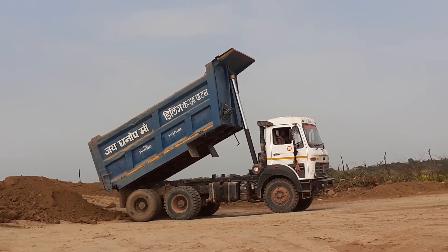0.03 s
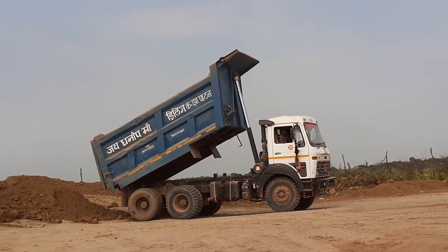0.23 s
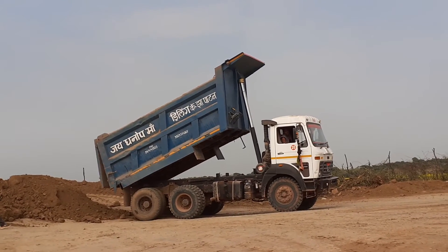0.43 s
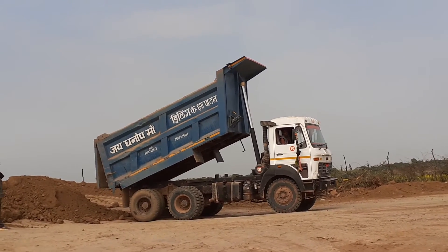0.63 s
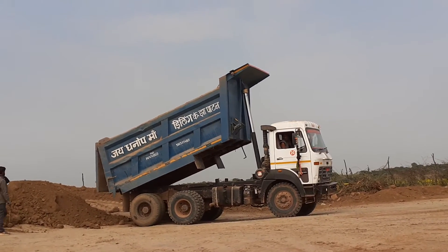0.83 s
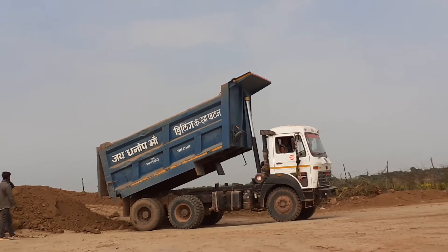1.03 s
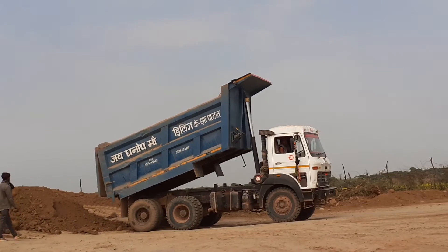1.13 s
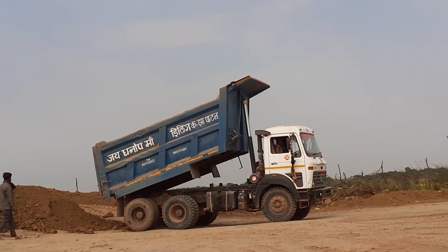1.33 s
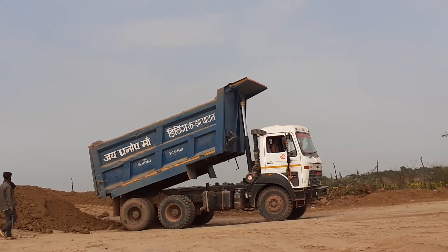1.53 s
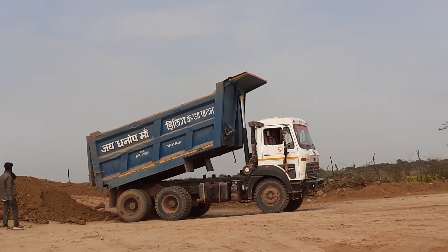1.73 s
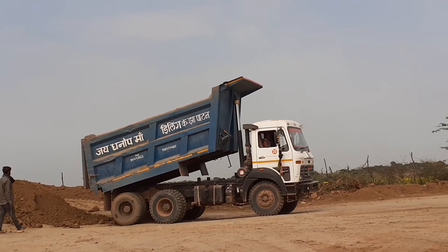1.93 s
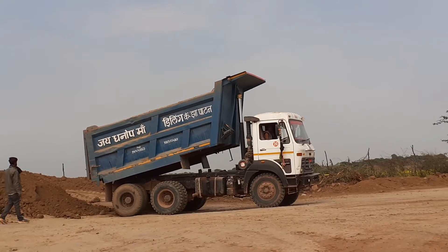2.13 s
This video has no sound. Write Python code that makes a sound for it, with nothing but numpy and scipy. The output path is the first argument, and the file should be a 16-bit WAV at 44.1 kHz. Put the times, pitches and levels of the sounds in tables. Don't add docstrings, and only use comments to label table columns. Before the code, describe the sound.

A dump truck's steel tailgate slams with a deep hollow boom, rings and rattles; after soft knocks and a latch clank it slams again, over steady diesel rumble, on open ground, heard through a phone.

```python
import sys
import numpy as np
from scipy import signal
from scipy.fft import rfft, irfft, next_fast_len
from scipy.io import wavfile
from scipy.ndimage import map_coordinates

SR = 44100
rng = np.random.default_rng(int(sys.argv[2]) if len(sys.argv) > 2 else 0)


def boost_factor(decibels):
    exponent = np.asarray(decibels, float) / 20
    return 10 ** exponent


def inscribe(sig):
    pcm = np.round(np.clip(np.atleast_2d(sig).T, -1, 1) * 32767)
    wavfile.write(sys.argv[1], SR, pcm.astype(np.int16))


N = 97020

# start in seconds, ring in dB, boom in dB, crack in dB.
FIRST_SLAM = [
    (.240, -44, -15.5, -15.5),
    (.249, -15.5, -17, -29),
    (.268, -23, -24, -28),
    (.324, -24.5, -27.5, -49),
]
SECOND_SLAM = [
    (1.551, -35, -17.5, -18.5),
    (1.560, -13.5, -19.5, -36),
    (1.584, -28.5, -21.5, -30.5),
    (1.648, -33, -30.5, -36.5),
]
LATCH_CLANK = [
    (1.379, -16.5, -30, -37),
    (1.3897, -24, -33, -35.5),
    (1.411, -27.5, -38, -44),
    (1.4205, -26.5, -39, -47),
    (1.433, -30.5, -43, -50),
]
# frequency in Hz, level in dB, t60 in seconds.
BED_LOW_MODES = [(98.2, -4, 1), (265.5, -9, 0.93), (368.7, -14, 0.88), (500, -10, 0.78), (612, -11, 0.52),
                 (635, -8, 0.65), (667, -13, 0.49), (733, -10, .4), (759, -7, 0.55), (797, -6.5, 0.29),
                 (1012, -22, 0.25), (1123, -12.5, 0.25)]
BED_HIGH_MODES = [(151.3, 2.5, 0.46), (259.5, -8, 0.79), (373, -9.5, 1), (495, -11, 0.46), (625, -6, 0.34),
                  (714, -9.5, 0.62), (771, -2.5, 0.41), (811, -7.5, 0.46), (883, -14, 0.31),
                  (993, -18, 0.12), (1134, -15.5, 0.34), (1350, -22, 0.29)]
LATCH_MODES = [(626, -11, 0.14), (739, 1, 0.12), (763, -11, 0.42), (800, -10, 0.23), (1235, -14, 0.061),
               (1480, -20, .1), (1755, -19.5, 0.083), (2130, -12, 0.098), (2380, -23, 0.056)]
BED_CYCLES, LATCH_CYCLES, GATE_CYCLES = 1.9, 3, 0.3
BEAT_DB, BEAT_RATE = 2, 14
DRIFT_RAD, DRIFT_RATE, DRIFT_AFTER_S = .45, 20, .04
REBOUND_FROM_HZ = 340
# frequency in Hz, level in dB.
PLATE_COLOUR = [(30, -2), (140, -5.5), (300, -0.5), (450, -15.5), (720, -1), (1100, -20), (4000, -32.5),
                (15500, -61)]
# frequency in Hz, t60 in seconds.
PLATE_T60 = [(60, 1), (250, 1), (800, 0.48), (3000, 0.6), (9000, 0.24)]
# frequency in Hz, level in dB.
CRACK_COLOUR = [(300, -32), (900, 12.5), (2000, -4.5), (8000, -13), (10000, -23.5), (14000, -16),
                (16000, -22)]
REBOUND_DULLING = [(3000, 7), (7500, 6), (9000, -20), (16000, -13)]
BOOM_RISE_S, CRACK_T60_S = 0.0022, .028

SLAP_S = [
    .248,
    1.56,
]
SLAP_DB = -10
# frequency in Hz, level in dB, t60 in seconds.
FIRST_GATE_MODES = [(138.5, 1, 0.16), (240, 2, 0.075), (604, -14, 0.26), (874, -10, 0.3)]
SECOND_GATE_MODES = [(126.7, 0, 0.17), (213, 4, 0.11), (244, -2.5, 0.15), (721, -3.5, 0.15),
                     (406, -12, 0.34)]
EDGE_MODES = [(617.4, -17.5, 0.11), (873, -23, 0.052), (1162, -30, .08), (1740, -29.5, 0.038)]
HOLLOW_MODES = [(203.7, -17.5, 0.23), (235.5, -2.5, 0.13), (459, -23, 0.16)]
FLOOR_MODES = [(180.7, 0, 0.61), (298.8, -2.5, 0.81)]
FLOOR_DB = [
    -10,
    -15,
]
CLIMB, CLIMB_S = .3, 0.0219
EDGE_S = [
    .241,
    .324,
    1.551,
]
EDGE_DB = [
    4,
    0,
    1.5,
]
# start in seconds, level in dB.
HOLLOW_HITS = [(1.386, -12.5), (1.9, -37.5), (1.2, -33), (1.6, -25), (0.3, -13), (.915, -30), (.935, -31.5),
               (.952, -28), (1.640, -22), (1.667, -25), (1.696, -17)]
FLOOR_NUDGES = [
    (.09, -31.5),
    (0.166, -25),
    (.905, -39.5),
    (1.72, -33),
    (1.829, -30),
]

# start in seconds, level in dB.
SOFT_KNOCKS = [
    (0.082, -24),
    (.165, -25),
    (0.198, -32),
    (0.221, -26),
    (.908, -28.5),
    (.925, -27),
    (0.954, -27),
]
# frequency in Hz, level in dB.
KNOCK_COLOUR = [(40, 2.5), (150, 9.5), (260, 5), (400, -1), (800, -42), (3000, -100)]
KNOCK_RISE_S, KNOCK_T60_S = 0.0013, 0.14
THUMPS_S = [
    .268,
    1.578,
    1.39,
]
THUMP_DB = [
    -42,
    -25,
    -39,
]
THUMP_HZ, THUMP_S = 55, .012
# start in seconds, frequency in Hz.
PINS = [
    (1.385, 11400),
    (1.408, 11400),
    (1.386, 7100),
    (1.398, 6950),
    (1.405, 4020),
]
PIN_DB = [-44.5, -53, -50, -45, -44]
PIN_T60_S = [.07, .06, 0.047, .06, 0.087]

# start in seconds, level in dB, t60 in seconds.
RATTLES = [
    (.243, -33, 0.43),
    (1.379, -37.5, 0.14),
    (1.552, -34, 0.34),
    (1.62, -40, 0.22),
]
RATTLE_RATE, RATTLE_SPREAD_DB = 900, 4
# frequency in Hz, level in dB.
GRIT_COLOUR = [(500, -4.5), (1300, 11.5), (2500, -5), (4000, -26), (7500, -3), (9000, -59), (16000, -41)]
# start in seconds, frequency in Hz, level in dB.
TICKS = [
    (.267, 3730, -30),
    (.280, 2010, -44),
    (0.297, 3030, -34),
    (0.323, 2930, -34),
    (1.584, 3300, -31),
    (1.589, 1950, -27),
    (1.623, 4140, -45),
    (1.648, 4500, -46),
    (1.657, 3670, -46),
    (1.742, 1510, -49),
]
TICK_T60_S = 0.09

# time in seconds, level in dB.
ENGINE_LEVEL = [
    (0, -27.5),
    (.24, -27.5),
    (.36, -33),
    (0.699, -33),
    (1.3, -33.5),
    (1.9, -34),
    (2.2, -32.5),
]
FIRING_HZ, JITTER = 108.3, 0.049
CYLINDERS_DB = [2.5, 1.5, -10, 1.5, 0.5, -4.5]
# frequency in Hz, level in dB.
EXHAUST_COLOUR = [(25, -31), (55, 1), (108, 8.5), (260, -1.5), (420, -6), (800, -21.5), (2000, -44)]
ROAR_COLOUR = [(25, -42), (55, 2), (200, -2.5), (400, -9), (900, -14), (1700, -31), (4000, -63)]
CLATTER_COLOUR = [(300, -56.5), (1250, 1), (1750, -7), (2100, -2.5), (2500, -5.5), (4200, -9.5),
                  (7500, -16.5), (15500, -28.5)]
EXHAUST_DB, ROAR_DB, CLATTER_DB = -7, -3, -11.5
GATED = 0.088
# frequency in Hz, width in Hz, level over the engine in dB.
WHINES = [(106.2, 25, -6.5), (1281, 43, -24), (2940, 11, -41), (9120, 28, -33), (2028, 135, -20.5)]

# frequency in Hz, likeness from 0 to 1.
ENGINE_ALIKE = [(60, 0.92), (200, 0.96), (700, 0.66), (1300, 0.51), (2000, 0.72), (5000, 0.43),
                (12000, 0.54)]
BED_ALIKE = [(100, .999), (900, 1), (2000, 0.72), (6000, 0.067), (12000, 0.5)]
ENGINE_LAG_S, BED_LAG_S, LAG_FROM_HZ = 0.0004664, .00017, 500
# frequency in Hz, level in dB.
RIGHT_MIC = [(100, 0), (1300, -1), (2400, 0), (5400, -3.5), (6100, -9.5), (7700, -28), (8600, -38),
             (13500, -12.5)]
PORT_HZ, PORT_WIDTH_HZ, PORT_GAIN = 1860, 128, 2.38
LOW_CUT_HZ, TOP_HZ = 43, 15900
CEILING, HARD = 1.0, 9


def unit(x):
    return x / np.sqrt(np.mean(x ** 2) + 1e-20)


def along(points, hz):
    f, v = np.transpose(points)
    return np.interp(np.log(hz + 1), np.log(f + 1), v)


def filtered(x, response):
    m = next_fast_len(x.shape[-1] + 8192)
    return irfft(rfft(x, m) * response(np.fft.rfftfreq(m, 1 / SR)), m)[..., :x.shape[-1]]


def causal(points):
    def response(hz):
        cepstrum = irfft(np.log(boost_factor(along(points, hz))))
        half = len(cepstrum) // 2
        cepstrum[1:half] *= 2
        cepstrum[half + 1:] = 0
        return np.exp(rfft(cepstrum))
    return response


def wobble(rate, size=None):
    size = size or N
    knots = rng.standard_normal(int(size * rate / SR) + 4)
    order = 3 if size == N else 1
    return map_coordinates(knots, [np.arange(size) * rate / SR], order=order)


def add(track, s, sound):
    part = track[:, round(s * SR):][:, :sound.shape[1]]
    part += sound[:, :part.shape[1]]


def ring(modes, cycles, size=30000, climb=0):
    t = np.arange(size) / SR
    loose = 1 - np.exp(-t / DRIFT_AFTER_S)
    climbing_t = t - climb * CLIMB_S * (1 - np.exp(-t / CLIMB_S))
    tone = 0
    for hz, db, t60 in modes:
        level = boost_factor(db - 60 * t / t60 + BEAT_DB * loose * wobble(BEAT_RATE, size=size))
        build_up = 1 - np.exp(-t * hz / cycles)
        drift = DRIFT_RAD * loose * wobble(DRIFT_RATE, size=size)
        tone = tone + level * build_up * np.sin(2 * np.pi * hz * climbing_t + drift)
    fade_out = np.minimum(1, 10 * (t[-1] - t))
    return tone * fade_out * [[1], [.3]]


def dying(colour, t60):
    hz, t, z = signal.stft(rng.standard_normal((2, SR)), SR, nperseg=512)
    z = z * boost_factor(along(colour, hz))[:, None]
    z = z / np.sqrt(np.mean(abs(z) ** 2) * len(hz))
    decay = boost_factor(-60 * t / t60(hz)[:, None])
    return signal.istft(z * decay, SR, nperseg=512)[1][:, :SR]


def struck(contacts, modes, damping, cycles):
    out, t = np.zeros((2, N)), np.arange(SR) / SR
    rise = 1 - np.exp(-t / BOOM_RISE_S)
    for k, (s, ring_db, boom_db, crack_db) in enumerate(contacts):
        boom = dying(PLATE_COLOUR, lambda hz: damping * along(PLATE_T60, hz))
        crack = unit(filtered(rng.standard_normal((2, SR)), causal(CRACK_COLOUR)))
        crack = crack * boost_factor(-60 * t / CRACK_T60_S)
        if k:
            crack = filtered(crack, causal(REBOUND_DULLING))
        if k > 1:
            modes = [m for m in modes if m[0] > REBOUND_FROM_HZ]
        add(out, s, boost_factor(ring_db) * ring(modes, cycles))
        add(out, s, rise * boost_factor(boom_db) * boom + boost_factor(crack_db) * crack)
    return out


def slams():
    out = struck(FIRST_SLAM, BED_LOW_MODES, 0.78, BED_CYCLES)
    out = out + struck(SECOND_SLAM, BED_HIGH_MODES, 0.89, BED_CYCLES)
    return out + struck(LATCH_CLANK, LATCH_MODES, 0.9, LATCH_CYCLES)


def panels():
    out = np.zeros((2, N))
    for s, modes in zip(SLAP_S, [FIRST_GATE_MODES, SECOND_GATE_MODES]):
        add(out, s, boost_factor(SLAP_DB) * ring(modes, GATE_CYCLES, size=15000))
    for s, db in zip(SLAP_S, FLOOR_DB):
        add(out, s, boost_factor(db) * ring(FLOOR_MODES, GATE_CYCLES, climb=CLIMB))
    for s, db in HOLLOW_HITS:
        add(out, s, boost_factor(db) * ring(HOLLOW_MODES, GATE_CYCLES, size=10000))
    for s, db in FLOOR_NUDGES:
        add(out, s, boost_factor(db) * ring(FLOOR_MODES, BED_CYCLES))
    for s, db in zip(EDGE_S, EDGE_DB):
        add(out, s, boost_factor(db) * ring(EDGE_MODES, GATE_CYCLES, size=10000))
    return out


def knocks():
    out, t = np.zeros((2, N)), np.arange(SR) / SR
    rise = 1 - np.exp(-t / KNOCK_RISE_S)
    for s, db in SOFT_KNOCKS:
        add(out, s, boost_factor(db) * rise * dying(KNOCK_COLOUR, lambda hz: KNOCK_T60_S + 0 * hz))
    swell = (t / THUMP_S) ** 2 * np.exp(2 - 2 * t / THUMP_S)
    for s, db in zip(THUMPS_S, THUMP_DB):
        add(out, s, boost_factor(db) * swell * np.sin(2 * np.pi * THUMP_HZ * t) * [[1], [0]])
    for (s, hz), db, t60 in zip(PINS, PIN_DB, PIN_T60_S):
        pin = np.sin(2 * np.pi * hz * t + 1.3 * wobble(320, size=SR))
        add(out, s, boost_factor(db - 60 * t / t60) * pin * [[1], [.7]])
    return out


def rattle():
    out, t = np.zeros((2, N)), np.arange(SR) / SR
    for s, db, t60 in RATTLES:
        hits = (rng.random(SR) < RATTLE_RATE / SR) * boost_factor(RATTLE_SPREAD_DB * rng.standard_normal(SR))
        envelope = signal.fftconvolve(hits, boost_factor(-60 * t[:900] / 0.0085))[:SR]
        bursts = envelope * rng.standard_normal((2, SR))
        add(out, s, boost_factor(db - 60 * t / t60) * unit(filtered(bursts, causal(GRIT_COLOUR))))
    t = t[:SR // 10]
    for s, hz, db in TICKS:
        tick = np.sin(2 * np.pi * hz * t + 1.07 * wobble(900, size=len(t)))
        add(out, s, boost_factor(db - 60 * t / TICK_T60_S) * tick * [[1], [.5]])
    return out


def pair(common, own, alike, lag_s):
    def angle(hz):
        return np.arccos(np.clip(along(alike, hz), -1, 1)) / 2
    mid = filtered(common, lambda hz: np.cos(angle(hz)))
    side = filtered(own, lambda hz: np.sin(angle(hz)))
    right = filtered(mid - side, lambda hz: np.exp(-2j * np.pi * hz * lag_s))
    return np.array([mid + side, right])


def engine_once(firing, gate):
    def coloured(x, points):
        return unit(filtered(x, causal(points)))
    out = boost_factor(EXHAUST_DB) * coloured(firing, EXHAUST_COLOUR)
    out = out + boost_factor(ROAR_DB + 1.8 * wobble(8.95)) * coloured(rng.standard_normal(N), ROAR_COLOUR)
    clatter = coloured(rng.standard_normal(N) * (1 + GATED * gate), CLATTER_COLOUR)
    out = out + boost_factor(CLATTER_DB + 0.49 * wobble(12.32)) * clatter
    for hz, width, db in WHINES:
        whine = filtered(rng.standard_normal(N), lambda f: 1 / (1 + (2 * (f - hz) / width) ** 2))
        out = out + boost_factor(db + 3.3 * wobble(7.2)) * unit(whine)
    return out


def engine():
    k = np.arange(int(FIRING_HZ * N / SR))
    chance = rng.standard_normal((len(k), 2))
    firing = np.zeros(N)
    at = ((k + .5 + JITTER * chance[:, 0]) * SR / FIRING_HZ).astype(int)
    firing[np.clip(at, 0, N - 1)] = boost_factor(np.array(CYLINDERS_DB)[k % 6] + 0.86 * chance[:, 1])
    gate = unit(signal.fftconvolve(firing, boost_factor(-60 * np.arange(2000) / SR / 0.016))[:N])
    common = engine_once(firing, gate)
    own = engine_once(rng.standard_normal(N), gate)
    left, right = pair(common, own, ENGINE_ALIKE, 0)

    def late(hz):
        return np.exp(-2j * np.pi * hz * ENGINE_LAG_S * hz ** 2 / (hz ** 2 + LAG_FROM_HZ ** 2))
    s, db = np.transpose(ENGINE_LEVEL)
    gain = boost_factor(np.interp(np.arange(N) / SR, s, db))
    return gain * np.array([left, filtered(right, late)])


def scene():
    common, own = slams() + panels() + knocks() + rattle()
    return pair(common, own, BED_ALIKE, BED_LAG_S) + engine()


def roll_off(x):
    return signal.sosfilt(signal.butter(12, 16270, fs=SR, output="sos"), x)


def record(dry):
    def right_response(hz):
        port = 1 + PORT_GAIN / (1 + (2 * (hz - PORT_HZ) / PORT_WIDTH_HZ) ** 2)
        return boost_factor(along(RIGHT_MIC, hz)) * port
    x = np.array([dry[0], filtered(dry[1], right_response)])
    x = filtered(x, lambda hz: (1j * hz / (LOW_CUT_HZ + 1j * hz)) ** 4 * (hz < TOP_HZ))
    x = x / (1 + abs(x / CEILING) ** HARD) ** (1 / HARD)
    return roll_off(x)


dry = scene()
out = record(dry)
inscribe(out)
```